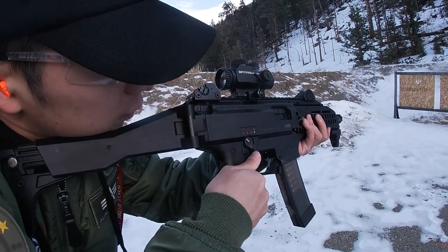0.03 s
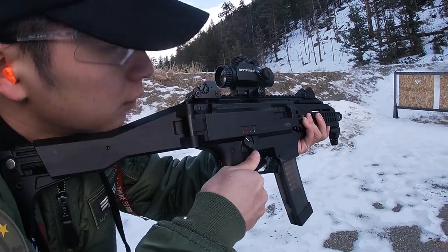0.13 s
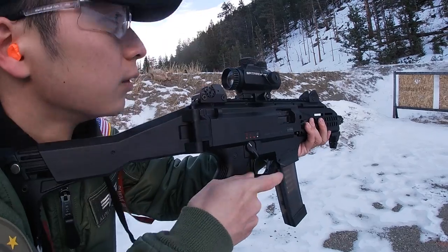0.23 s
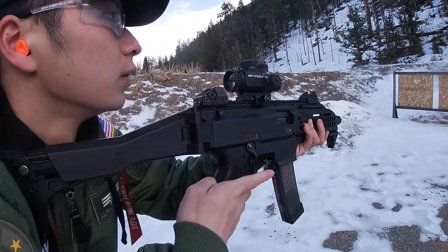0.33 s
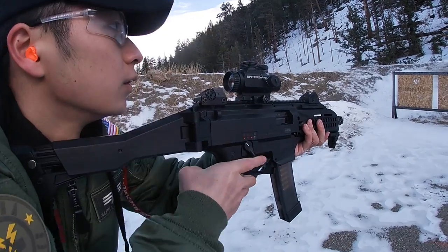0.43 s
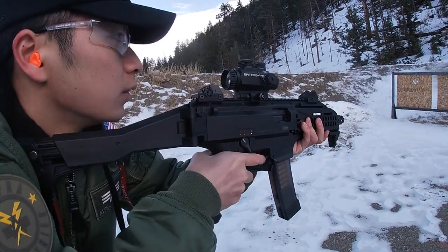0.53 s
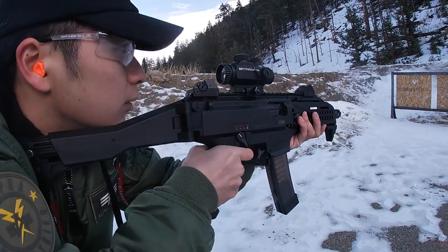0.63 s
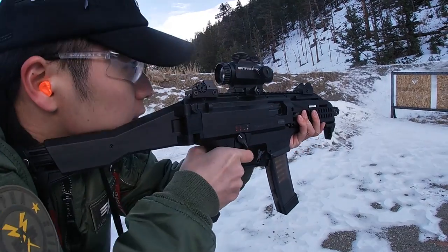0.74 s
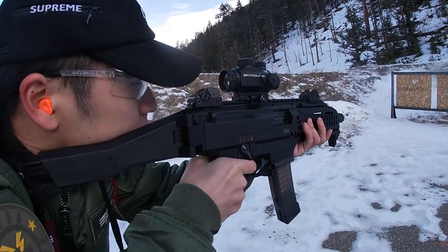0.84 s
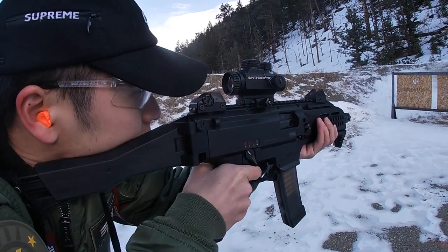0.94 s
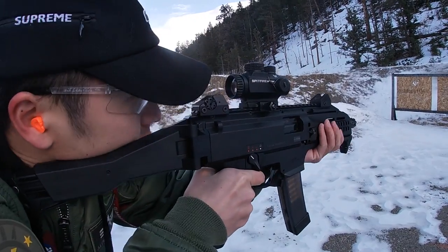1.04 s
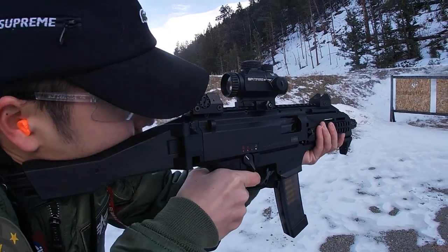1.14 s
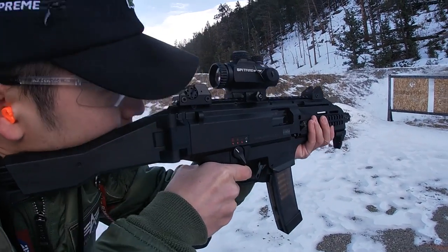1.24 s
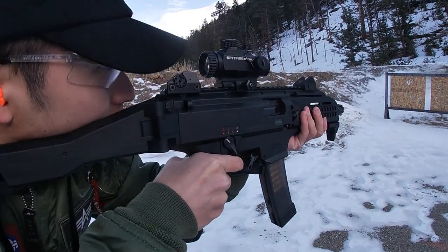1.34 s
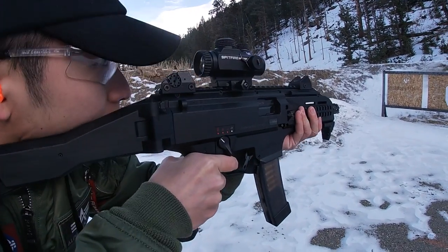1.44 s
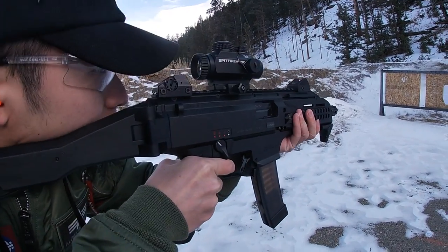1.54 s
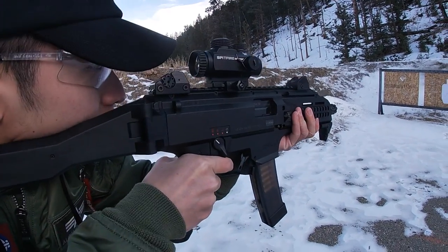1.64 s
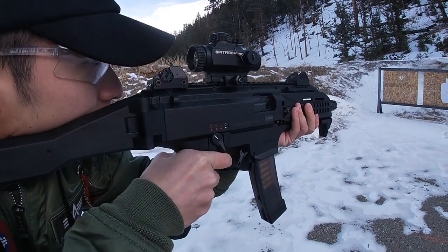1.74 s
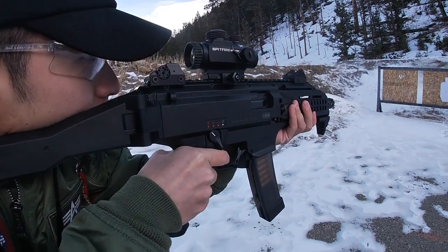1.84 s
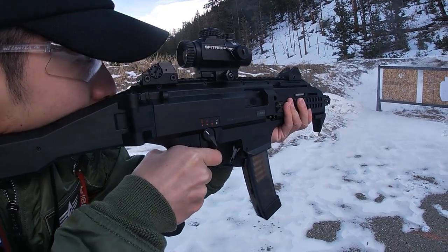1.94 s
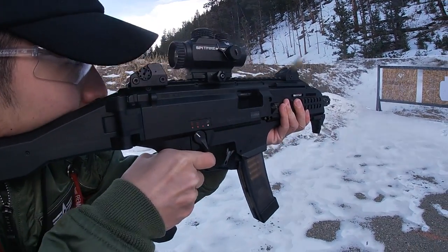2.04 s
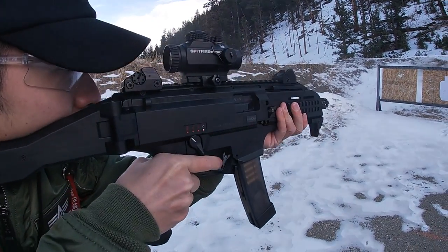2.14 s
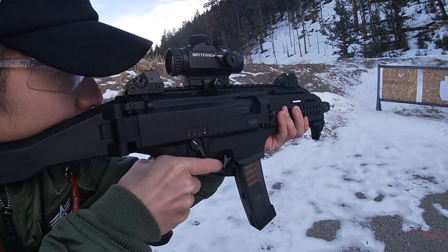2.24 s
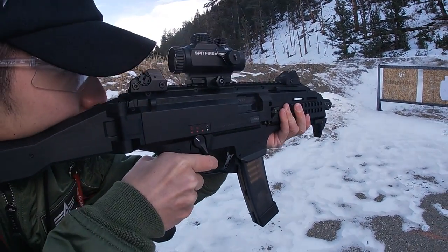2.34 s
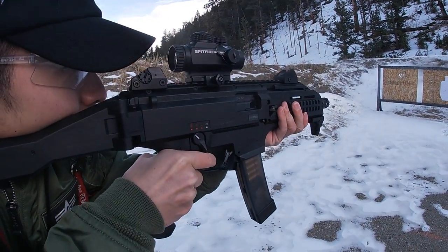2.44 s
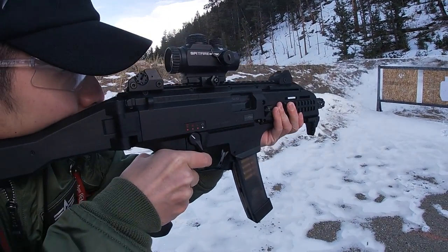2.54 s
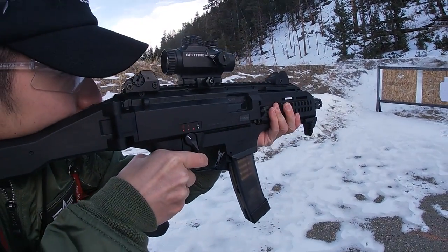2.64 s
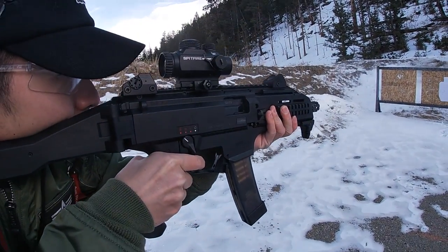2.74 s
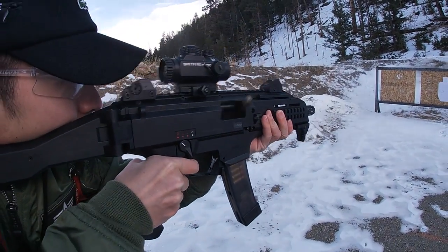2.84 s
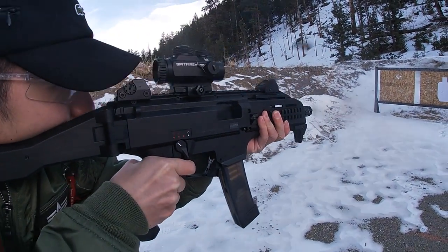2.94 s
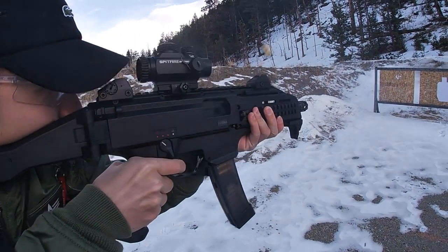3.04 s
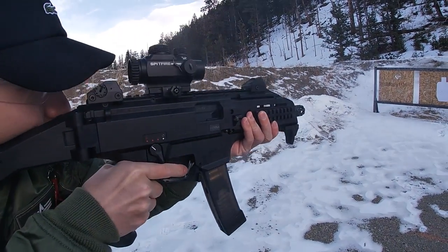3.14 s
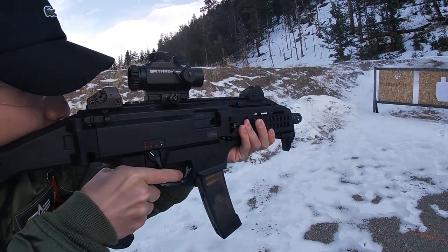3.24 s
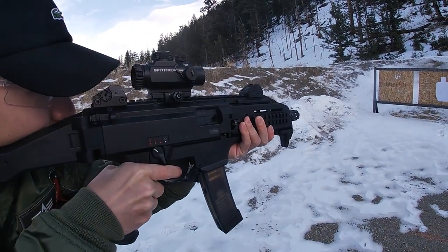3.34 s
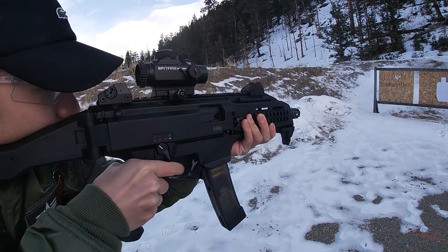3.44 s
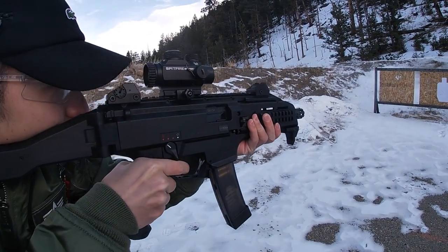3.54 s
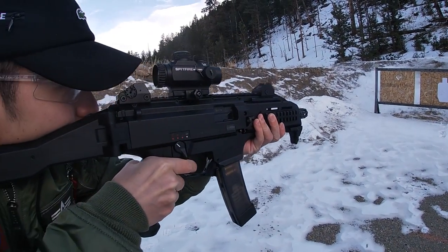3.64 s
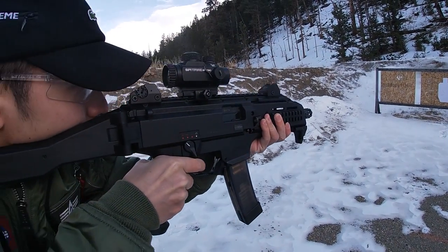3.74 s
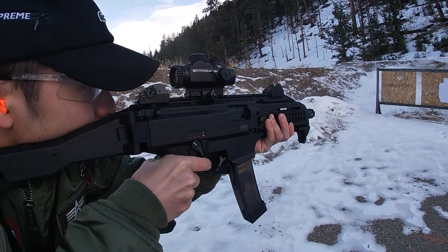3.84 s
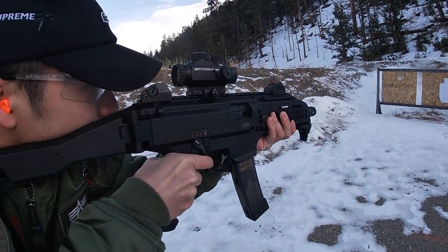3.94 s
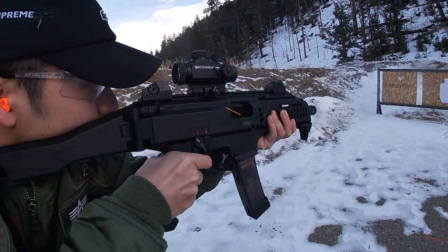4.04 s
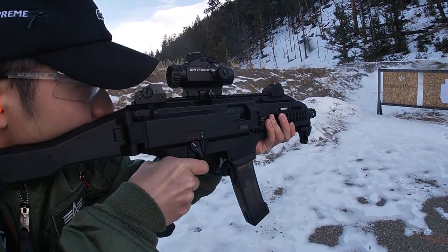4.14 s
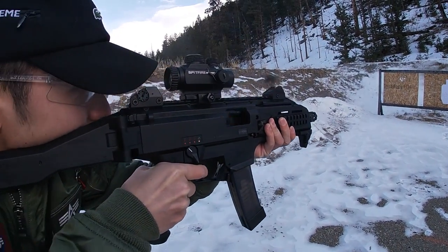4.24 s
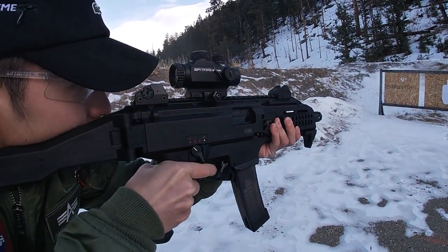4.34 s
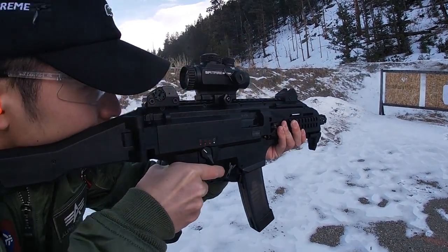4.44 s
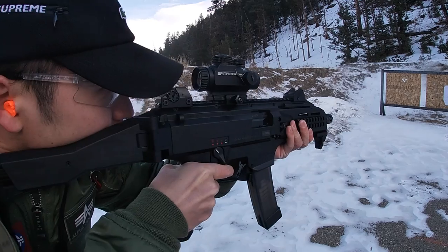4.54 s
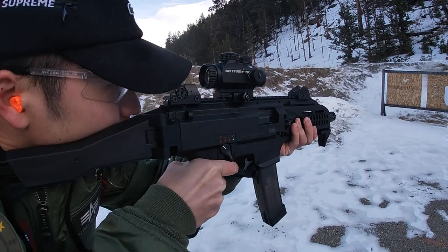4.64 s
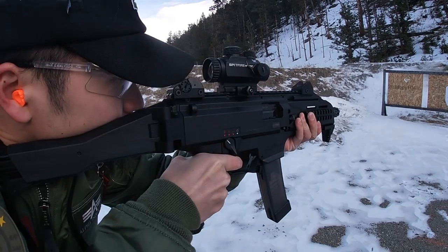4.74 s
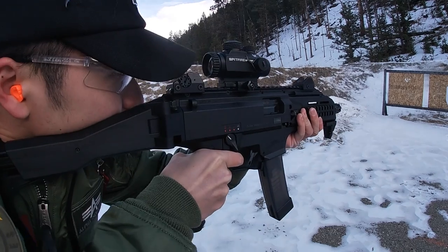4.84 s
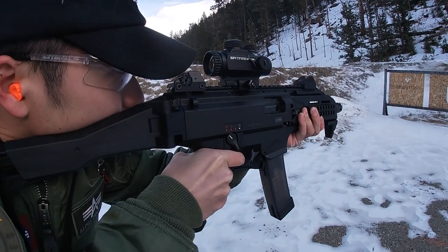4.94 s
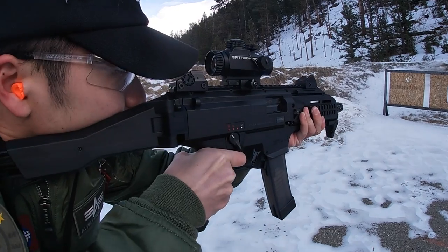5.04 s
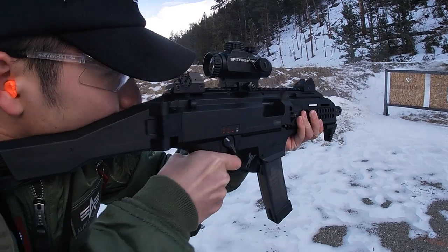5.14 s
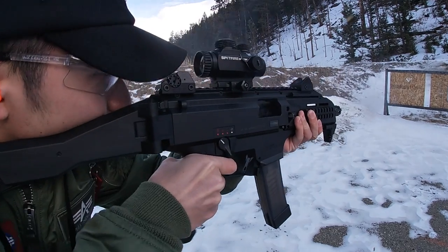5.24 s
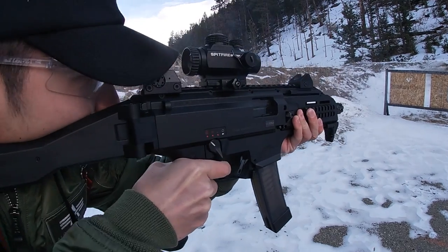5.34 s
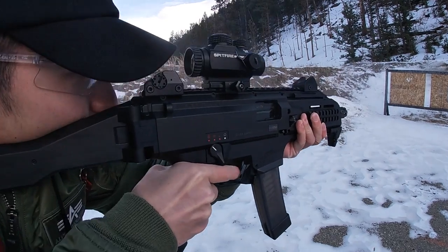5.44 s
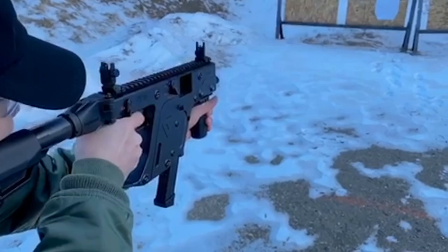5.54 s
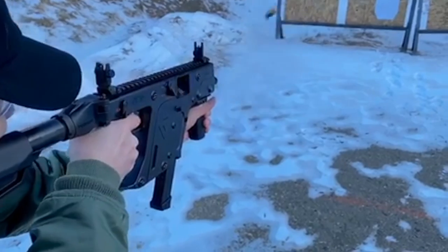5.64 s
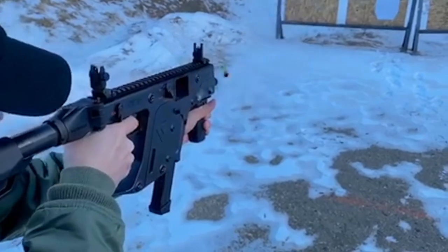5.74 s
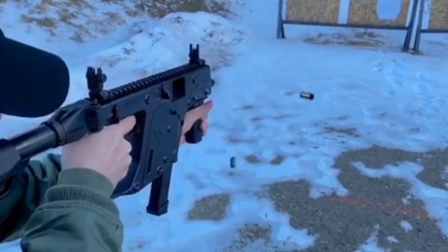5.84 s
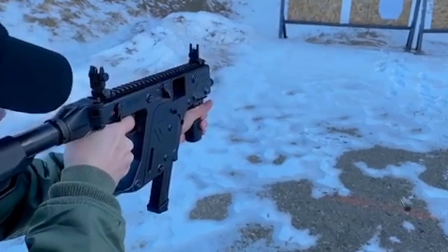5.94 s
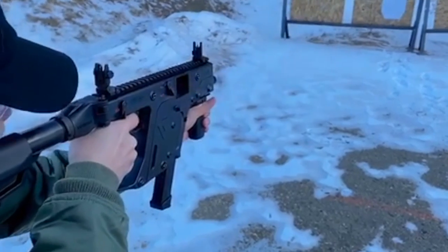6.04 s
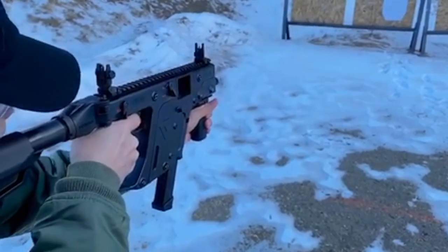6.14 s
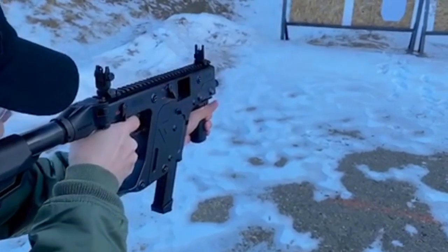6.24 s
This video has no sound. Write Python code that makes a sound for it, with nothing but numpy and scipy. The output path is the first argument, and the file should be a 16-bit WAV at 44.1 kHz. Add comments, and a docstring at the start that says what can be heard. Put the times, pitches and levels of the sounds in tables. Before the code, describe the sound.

Outdoors, low wind gusts rumble on the microphone over a soft rush of air. A safety catch clicks sharply at 0.1 seconds. Faint handling ticks and a rubbing sleeve follow through the first second, with a tiny squeak near 0.5. At 2.0 seconds a submachine gun fires a rapid three-shot burst at arm's length, the loudest and brightest. Four-shot bursts follow at 2.9 and 4.2 seconds, then five shots at 5.2. Each is heavy and punchy, with a steel bolt clacking between shots, a quick slap back and a hillside echo that rolls away for about a second. At about 5.6 seconds the wind and echo stop abruptly, and a second gun fires one faster, thinner, quieter three-shot burst with its own echo. As that fades, an empty brass case lands with a faint tick and a high ping at 6.2 seconds.

```python
"""Submachine guns on a snowy range

Two guns fire short bursts outdoors, an arm's length from the microphone. Each shot is a blast of gas,
then the bolt (the sliding steel block that loads a round) slams home, so a burst ends on the bolt.
An earth bank slaps the sound back and a wooded hillside rolls it away. Wind, a safety catch, rubbing
cloth and small ticks fill the pauses, and at the end an empty brass case pings on the gravel."""
import sys
import numpy as np
from scipy import signal
from scipy.fft import rfft, irfft
from scipy.io import wavfile

SR = 44100
rng = np.random.default_rng(int(sys.argv[2]) if len(sys.argv) > 2 else 0)


def output_pcm(signal):
    """Save a mono or channel-first signal as 16-bit PCM at the path in sys.argv[1].

    Samples are clipped to [-1, 1] before scaling.
    """
    pcm = np.clip(np.atleast_2d(signal).T, -1, 1) * 32767
    wavfile.write(sys.argv[1], SR, np.round(pcm).astype(np.int16))


N = 277830
T = np.arange(N) / SR
TOP_HZ = 15800  # the highest pitch the microphone passes

# Ringing tones heard in the bolt's slam and in the swell before each burst. Each row: pitch in Hz, level in dB,
# seconds to fade by 60 dB.
RING_TONES = [(234, 3.5, 0.37), (333, 0.5, 0.17), (1080, -5.5, 0.26), (2300, -5.5, 0.25),
              (2746, -1.5, 0.17), (3210, -7, .1), (3320, -6.5, .1), (4140, -15, .1), (4450, -14.5, 0.079),
              (4880, -10, 0.11), (5340, -7.5, 0.19), (5800, -11, 0.11), (7490, -17.5, 0.14),
              (9050, -28, .1)]


def undb(db):
    """Turn decibels into a number to multiply by."""
    return 10 ** (np.asarray(db) / 20)


def unit(x):
    """Scale a sound so that its average power is 1."""
    return x / np.sqrt(np.mean(x ** 2))


def curve(rows, column=1):
    """Follow one column of a table through time, in straight lines from row to row."""
    rows = np.array(rows)
    return np.interp(T, rows[:, 0], rows[:, column])


def add(track, s, sound):
    """Mix a sound into a track, starting at s seconds."""
    i = int(s * SR)
    track[i:i + len(sound)] += sound[:N - i]


def colour(x, points, size=4096):
    """Make some pitches stronger and others weaker, following (Hz, dB) points."""
    hz, db = np.transpose(points)
    grid_hz = np.arange(size // 2 + 1) * SR / size
    gain = undb(np.interp(np.log(grid_hz + 1), np.log(hz), db))
    # Build the filter so that nothing comes out before the sound goes in.
    cepstrum = irfft(np.log(unit(gain)))
    cepstrum[1:size // 2] *= 2
    cepstrum[size // 2 + 1:] = 0
    return signal.fftconvolve(x, irfft(np.exp(rfft(cepstrum))))[:len(x)]


def band(x, low_hz, high_hz, order=2):
    """Keep the pitches between two limits."""
    return signal.sosfilt(signal.butter(order, [low_hz, high_hz], "band", fs=SR, output="sos"), x)


def wander(rate, count=N):
    """Drift to a new random value, of size about 1, rate times a second."""
    steps = np.arange(count) * rate / SR
    return unit(np.interp(steps, np.arange(count // 20), rng.standard_normal(count // 20)))


def ring(tones, t):
    """Pure tones that are loudest at t = 0 and fade on either side."""
    return sum(undb(db - 60 * abs(t) / fade_s) * np.sin(2 * np.pi * hz * t + rng.uniform(0, 2 * np.pi))
               for hz, db, fade_s in tones)


def crackle(t, rise_s, hold_s, decay_s):
    """Rough noise that swells up to t = 0, holds and dies away."""
    roughness = undb(3.1 * wander(901.8, count=len(t)))
    loudness = np.exp(np.minimum(t, 0) / rise_s - np.maximum(t - hold_s, 0) / decay_s)
    return roughness * rng.standard_normal(len(t)) * loudness


def swing(t, hz, decay_s):
    """Air pressure swings up and down from t = 0 and settles."""
    t = np.maximum(t, 0)
    return np.sin(2 * np.pi * hz * t) * np.exp(-t / decay_s)


def wind():
    """Gusts rumble on the microphone, surging at random; smaller swirls flutter."""
    # The wind's tone. Each row: pitch in Hz, level in dB.
    wind_colour = [(20, 7), (35, -0.5), (70, -4), (110, -6), (165, 0), (240, -8.5), (330, -16.5),
                   (500, -25), (800, -41), (1500, -66)]
    # The wind's strength. Each row: time in seconds, rumble in dB, flutter in dB.
    gusts = [(0.0, -35.5, -27), (0.14, -34, -27.5), (0.28, -37.5, -38), (0.58, -33, -24.5),
             (0.96, -38.5, -37), (1.26, -30, -24), (1.48, -43, -34), (1.76, -30, -25.5), (2.0, -29, -26),
             (2.35, -37, -43), (2.62, -33.5, -38.5), (2.82, -36, -44.5), (3.42, -44, -52),
             (3.64, -37, -46.5), (3.78, -51, -49), (4.06, -32.5, -32), (4.56, -39.5, -56), (4.8, -34, -35),
             (5.15, -36.5, -39.5)]
    deep, swirls = (colour(rng.standard_normal(N), wind_colour) for _ in range(2))
    surge_db = 2.3 * wander(12)
    rumble_db = curve(gusts, column=1) + surge_db - 1.3
    flutter_db = curve(gusts, column=2) + surge_db + 2.75 * wander(30) - 3.3
    return unit(band(deep, 32, 90)) * undb(rumble_db) + unit(band(swirls, 65, 900)) * undb(flutter_db)


def air_rush():
    """The open air makes a broad, wavering rush."""
    # The tone of the rush. Each row: pitch in Hz, level in dB.
    air_colour = [(60, -9), (130, -1), (300, -3.5), (450, -2), (800, 1), (1200, -7.5), (1600, -9.5),
                  (2400, -21.5), (4000, -35.5), (6000, -43.5), (7000, -61), (10000, -65), (15000, -78)]
    # Its strength. Each row: time in seconds, level in dB.
    levels = [(0, -42.5), (.6, -38), (1.98, -41.5), (2.05, -59), (4.1, -60), (4.9, -64.5), (6.3, -68.5)]
    return colour(rng.standard_normal(N), air_colour) * undb(curve(levels) + 0.36 * wander(11))


def sleeve():
    """A sleeve slides and snags, rubbing hardest as the gun comes up to the shoulder."""
    # The tone of rubbing cloth. Each row: pitch in Hz, level in dB.
    cloth_colour = [(1500, -25), (2800, -2), (4200, 3.5), (5500, 0), (6800, -8.5), (7800, -7),
                    (9300, -15.5), (11000, -31), (15000, -37)]
    peak_s, rise_db_per_s, fall_db_per_s = .5, 13, 15.5
    fade_db = np.maximum((peak_s - T) * rise_db_per_s, (T - peak_s) * fall_db_per_s)
    grains = rng.standard_normal(N) * undb(3.5 * wander(600))
    snags = undb(2.5 * wander(45))
    return unit(colour(grains * snags, cloth_colour)) * undb(-61 - fade_db)


def handling_ticks():
    """The safety catch, the trigger and loose fittings tick, and small steel parts ring."""
    # The safety catch, then trigger and handling ticks. Each row: start in seconds, relative level in dB.
    ticks = [(0.111, 0), (.161, -39), (.220, -32.5), (.768, -33), (.879, -34), (1.0686, -43), (1.949, -37),
             (3.7774, -48), (3.976, -52.5), (4.0627, -51), (5.086, -44)]
    # The tone of a tick. Each row: pitch in Hz, level in dB.
    tick_colour = [(700, -23), (1200, -4.5), (1600, 1.5), (3300, 6), (4700, 2.5), (5700, -9.5), (8400, -8),
                   (10000, -25), (15000, -55.5)]
    # The catch's ring. Each row: pitch in Hz, level in dB, seconds to fade by 60 dB.
    catch_tones = [(3350, 7.5, 0.028), (4447, -3, 0.057), (5440, 1.5, 0.064), (6067, -3, 0.055),
                   (6270, -10, 0.035), (7950, 1, 0.069), (8300, -4.5, 0.055)]
    when, softness = rng.random((12, 2)).T  # fittings tick at random as the gun is raised
    fittings = list(zip(np.interp(when, [0, 1], [.2, 1.1]), -37 - 7 * softness))
    taps, t = np.zeros(N), T[:SR // 10]
    for s, db in ticks + fittings:
        add(taps, s, undb(db - 14.5) * crackle(t, rise_s=1, hold_s=0.0011, decay_s=0.002))
    ringing = signal.fftconvolve(taps, ring(catch_tones, t))[:N]
    return colour(taps, tick_colour) + undb(-48) * ringing


def stock_squeak():
    """The gun's shoulder rest squeaks briefly against the jacket."""
    # The squeak: its middle in seconds, pitch in Hz, level in dB, half its length in seconds.
    squeak = (.458, 4000, -51, .016)
    s, hz, db, half_s = squeak
    hiss = unit(band(rng.standard_normal(N), hz - 150, hz + 150))
    return undb(db) * hiss * np.exp(-((T - s) / half_s) ** 2)


def firing_times(bursts, first_db, first_rise_s, first_knock_db, rise_s, decay_s, sag_db, return_s,
                 bolt_db):
    """List evenly spaced shots, each weaker than the last, and the bolt's slam after each one."""
    shots, slams = [], []
    for start_s, gap_s, rounds, db, knock_db, *_ in bursts:
        shots.append((start_s, db + first_db, first_rise_s, decay_s, knock_db + first_knock_db))
        for k in range(round(rounds)):
            s = start_s + k * gap_s
            if k:
                shots.append((s, db - k * sag_db, rise_s, decay_s, knock_db))
            slams.append((s + return_s, db - k * sag_db + bolt_db))
    return shots, slams


def opening_ring(bursts, points, lead_s, grit_db):
    """A rough ring swells into the first shot of each burst."""
    out, t = np.zeros(N), np.arange(-SR // 20, SR // 50) / SR
    for s, *_, ring_db, low_hz, swell_s in bursts:
        swell = np.interp(t / swell_s, [-1.4, -1, -.75, 0, .5], [0, .15, .75, 1, 0])
        tonal = band(ring(RING_TONES, t), low_hz, TOP_HZ, order=5)
        grit = colour(rng.standard_normal(len(t)), points)
        add(out, s - lead_s + t[0], undb(ring_db) * swell * (tonal + undb(grit_db) * grit))
    return out


def muzzle_blasts(shots, points, hold_s, gas_db, crack_db, push_db, push_hz, push_s,
                  ground_s, ground_db, ground_hz, boom_db, boom_hz):
    """Gas cracks and roars, air is pushed out and sucked back, and the ground knocks and booms."""
    gas, pressure = np.zeros(N), np.zeros(N)
    t = np.arange(-SR // 20, SR // 10) / SR
    for s, db, rise_s, decay_s, knock_db in shots:
        stretch = 1 + .1 * rng.standard_normal()  # no two shots are quite alike
        crack = undb(crack_db) * crackle(t - .001, rise_s=0.00046, hold_s=0.0033, decay_s=.0008)
        roar = crackle(t, rise_s, hold_s, decay_s)
        add(gas, s + t[0], undb(db + gas_db) * (roar + crack))
        push = undb(push_db) * swing(t + 0.0015, push_hz * stretch, push_s)
        knock = undb(ground_db + knock_db) * swing(t - ground_s * stretch, ground_hz / stretch, 0.0037)
        boom = undb(boom_db) * swing(t - ground_s - .003, boom_hz * stretch, 0.0018)
        add(pressure, s + t[0], undb(db) * (push - knock + boom))
    return colour(gas, points) + pressure


def bolt_slams(slams, points, hold_s, clack_db, slide_db, steel_db, thud_db, thud_hz, spring_db):
    """The bolt clacks shut, rings the steel, jolts the gun's body and leaves the spring singing."""
    clacks, body = np.zeros(N), np.zeros(N)
    t = np.arange(-SR // 20, SR // 5) / SR
    contact = .5 + .5 * np.tanh(t / .0004)  # goes from 0 to 1 as the bolt hits
    for s, db in slams:
        # The bolt picks up a round on its way forward, and rattles after.
        slide = undb(slide_db) * crackle(t, rise_s=0.0068, hold_s=0, decay_s=0.0023)
        hit = crackle(t - .001, rise_s=.0007, hold_s=hold_s, decay_s=0.0026)
        add(clacks, s + t[0], undb(db + clack_db) * (hit + slide))
        steel = undb(steel_db) * ring(RING_TONES, t) * np.exp(-abs(t) / 0.0084)  # hands muffle it
        spring = undb(spring_db) * ring([(8270, 0.0034, 0.087)], t)
        thud = undb(thud_db) * swing(t - .003, thud_hz * rng.uniform(0.83, 1.0), 0.0059)
        add(body, s + t[0], undb(db) * (contact * (steel + spring) - thud))
    return colour(clacks, points) + body


def hillside_echo(shots, points, db, peak_s, early_db, low_fade_s, high_fade_s):
    """Thousands of tree trunks scatter each shot; the echo builds, then fades, high pitches first."""
    out, edges_hz = np.zeros(N), np.geomspace(40, 16000, 10)
    scatter = rfft(colour(rng.standard_normal(N) * undb(2 * wander(70)), points))
    hz = np.arange(len(scatter)) * SR / N
    for low, high in zip(edges_hz, edges_hz[1:]):
        fade_s = np.interp(np.log(low), np.log([400, 5000]), [low_fade_s, high_fade_s])
        echo_db = np.where(T < peak_s, early_db * (1 - (T / peak_s) ** 3), -60 * (T - peak_s) / fade_s)
        echo_power, power = undb(echo_db) ** 2, np.zeros(N)
        for s, shot_db, *_ in shots:
            add(power, s, undb(shot_db) ** 2 * echo_power)
        out += np.sqrt(power) * irfft(scatter * (hz >= low) * (hz < high), N)
    return undb(db) * out


def bank_echo(direct, db, delay_s=.102):
    """One slap comes back from the earth bank behind the targets."""
    out = np.zeros(N)
    add(out, delay_s, undb(db) * band(direct, 200, 7000, order=1))
    return out


def first_gun():
    """Four heavy bursts of three to five shots, the first burst the loudest and brightest."""
    # Each row is a burst: start in seconds, seconds between shots, number of shots, level in dB, ground knock
    # in dB, treble boost in dB, then the ring's level in dB, low edge in Hz and swell in seconds.
    bursts = [(2.0158, 0.056, 3, 2, 1, 6.5, -12.5, 150, 0.03),
              (2.942, 0.059, 4, 0, -1, -4.5, -28, 3200, 0.023),
              (4.155, .0565, 4, -1, 4.5, 3.5, -21, 3140, 0.024),
              (5.1912, 0.057, 5, -2.5, 8.5, 3, -31.5, 4350, 0.025)]
    # The tone of the blast, the bolt and the hillside. Each row: pitch in Hz, level in dB.
    blast_colour = [(30, 7.5), (140, 11.5), (250, 3.5), (400, 1.5), (700, 2.5), (1300, -6), (2000, -5),
                    (3000, -9), (5800, -12), (7000, -25), (9500, -31.5), (12500, -44), (15500, -75.5)]
    bolt_colour = [(30, 9.5), (130, 11), (300, 3.5), (700, 4), (1300, -4.5), (2500, -10), (5800, -12.5),
                   (7000, -23), (9500, -33.5), (12500, -48), (15500, -72.5)]
    hill_colour = [(60, 8), (200, 2.5), (700, 0), (1500, -3.5), (3000, -10), (5800, -16), (7000, -31),
                   (9500, -37.5), (12000, -52.5)]
    shots, slams = firing_times(bursts, first_db=2.5, first_rise_s=.0025, first_knock_db=-5,
                                rise_s=.0035, decay_s=0.0077, sag_db=0.36, return_s=.0466, bolt_db=0)
    blasts = muzzle_blasts(shots, blast_colour, hold_s=0.0081, gas_db=-13.5, crack_db=3,
                           push_db=-7.5, push_hz=42, push_s=0.012,
                           ground_s=.005, ground_db=-9.5, ground_hz=395, boom_db=-10, boom_hz=165)
    bolt = bolt_slams(slams, bolt_colour, hold_s=0.0028, clack_db=-9.5, slide_db=-8,
                      steel_db=-21, thud_db=-9, thud_hz=139, spring_db=-42)
    direct = blasts + bolt
    treble = signal.sosfiltfilt(signal.butter(4, 9500, "high", fs=SR, output="sos"), direct)
    direct += (undb(curve(bursts, column=5)) - 1) * treble
    lead_ring = opening_ring(bursts, bolt_colour, lead_s=.0022, grit_db=-6)
    echo = hillside_echo(shots, hill_colour, db=-43.5, peak_s=0.19, early_db=-11,
                         low_fade_s=1.18, high_fade_s=0.62)
    return direct + lead_ring + echo + bank_echo(direct, db=-27)


def second_gun():
    """One fast, thin burst, with a light clack just before the bolt's last slam."""
    # The one row: start in seconds, seconds between shots, number of shots, level in dB, ground knock in dB,
    # then the ring's level in dB, low edge in Hz and swell in seconds.
    bursts = [(5.586, .047, 3, -9, -17.5, -32, 1510, 0.019)]
    # The tone of the blast, the bolt and the hillside. Each row: pitch in Hz, level in dB.
    blast_colour = [(30, 5), (150, -8), (400, 5), (900, -7.5), (1400, -4), (2500, -12), (5000, -9),
                    (7400, -14.5), (8500, -28), (10300, -15), (12000, -41), (13500, -20), (15500, -32)]
    bolt_colour = [(30, -31), (130, -3.5), (300, -8), (850, 9.5), (1300, -6), (2500, -5.5), (4000, -17),
                   (7000, -21), (10000, -25.5), (15000, -30)]
    hill_colour = [(60, -15), (200, -7.5), (600, 0), (900, 5.5), (1400, -3.5), (2300, -5), (3500, -17.5),
                   (7000, -24.5), (10500, -27), (14500, -37)]
    shots, slams = firing_times(bursts, first_db=5, first_rise_s=0.0038, first_knock_db=13,
                                rise_s=0.0034, decay_s=0.0057, sag_db=0.76, return_s=.0442, bolt_db=2.5)
    blasts = muzzle_blasts(shots, blast_colour, hold_s=0.0094, gas_db=-16, crack_db=5,
                           push_db=-21, push_hz=30, push_s=0.043,
                           ground_s=0.0118, ground_db=-1, ground_hz=119, boom_db=-29, boom_hz=198)
    light_clack = (slams[-1][0] - .012, -18)
    bolt = bolt_slams(slams + [light_clack], bolt_colour, hold_s=0.0012, clack_db=-9, slide_db=-18.5,
                      steel_db=-39, thud_db=-15.5, thud_hz=117, spring_db=-66)
    lead_ring = opening_ring(bursts, blast_colour, lead_s=0.0016, grit_db=7)
    echo = hillside_echo(shots, hill_colour, db=-46, peak_s=0.36, early_db=-10,
                         low_fade_s=1.0, high_fade_s=0.59)
    return blasts + bolt + lead_ring + echo + bank_echo(blasts, db=-24)


def spent_case():
    """An empty brass case ticks on the gravel and pings."""
    # The landing: start in seconds, tick in dB, ping in Hz, ping in dB, seconds to fade by 60 dB.
    landing = (6.2405, -42, 11520, -56, .25)
    s, tick_db, hz, ping_db, fade_s = landing
    out, t = np.zeros(N), T[:SR // 5]
    tick = band(crackle(t, rise_s=1, hold_s=0.0002, decay_s=0.0011), 2000, 15000)
    add(out, s, undb(tick_db) * tick + ring([(hz, ping_db, fade_s)], t))
    return out


def scene():
    """Mix everything; the wind and the first gun stop abruptly just before the second gun fires."""
    stop_s = 5.556
    until_stop = np.clip((stop_s - T) * 200, 0, 1)
    mix = until_stop * (wind() + first_gun()) + second_gun()
    mix += handling_ticks() + sleeve() + stock_squeak() + spent_case() + air_rush()
    return mix[None]


def record(dry):
    """The microphone rounds off the loudest peaks, and the highest pitches are cut away."""
    return signal.sosfilt(signal.ellip(10, .2, 80, TOP_HZ, fs=SR, output="sos"), np.tanh(dry))


dry = scene()
out = record(dry)
output_pcm(out)
```